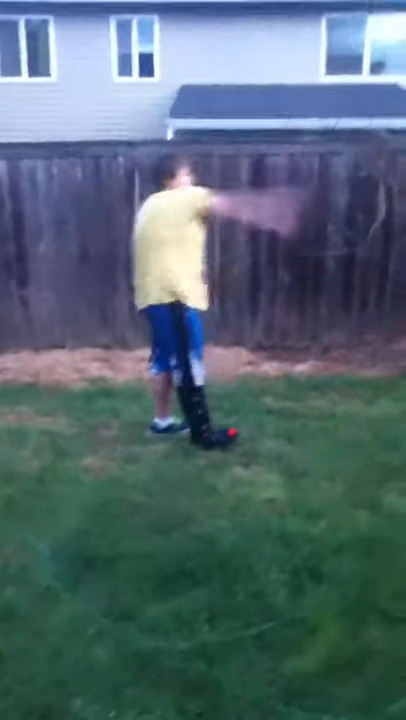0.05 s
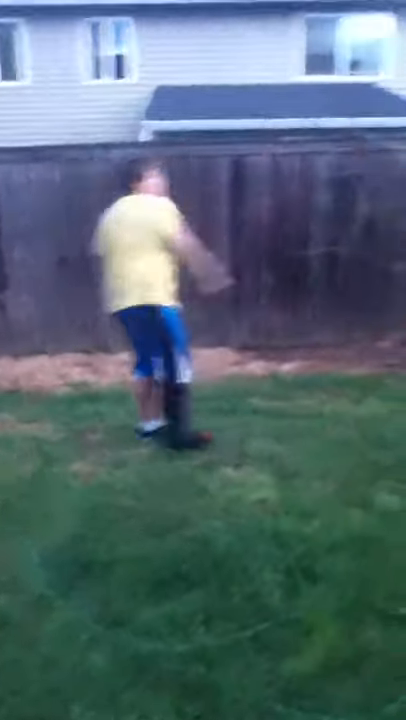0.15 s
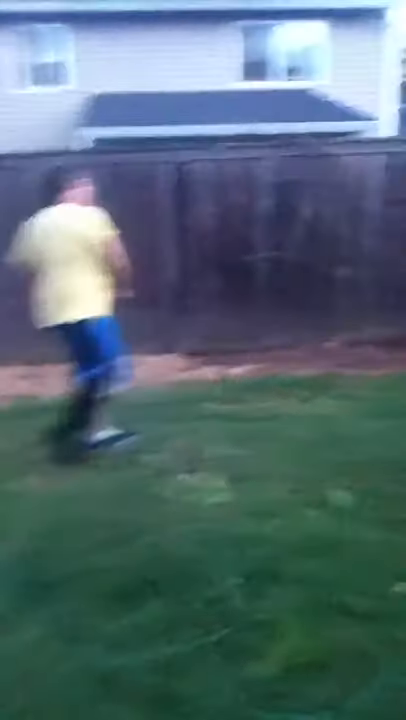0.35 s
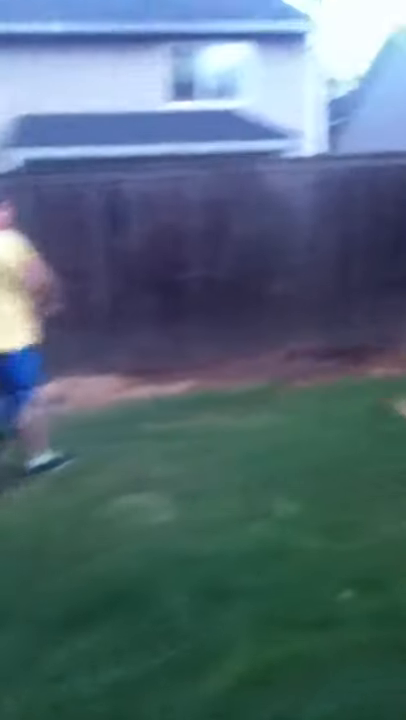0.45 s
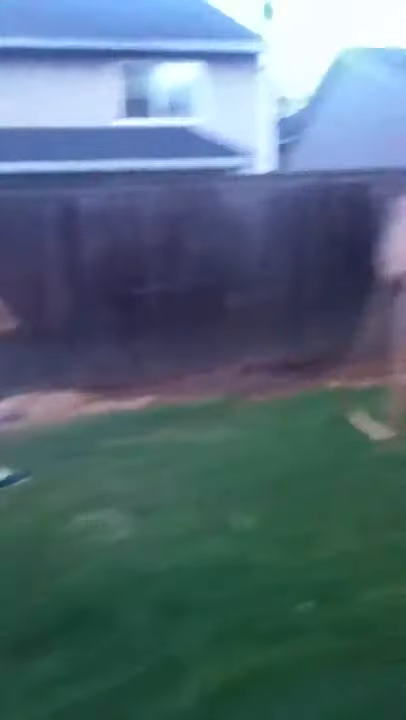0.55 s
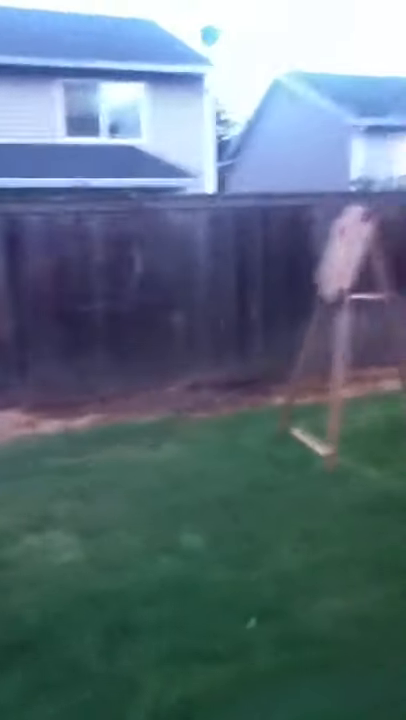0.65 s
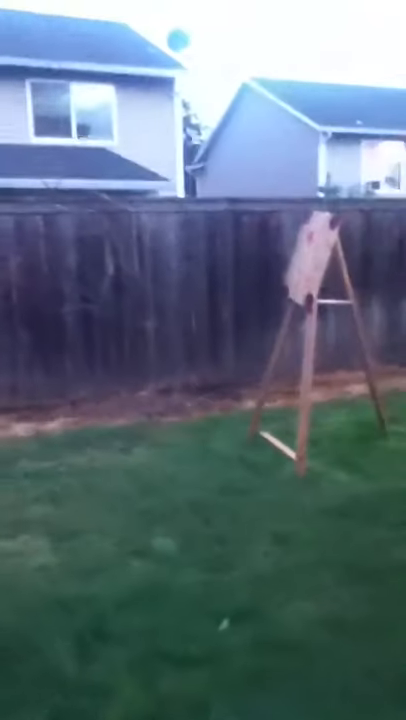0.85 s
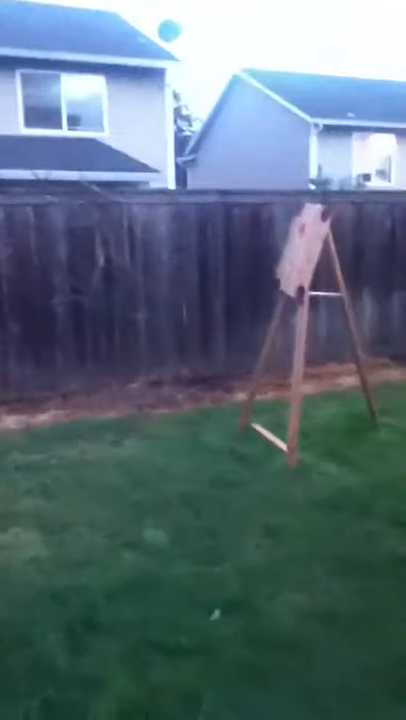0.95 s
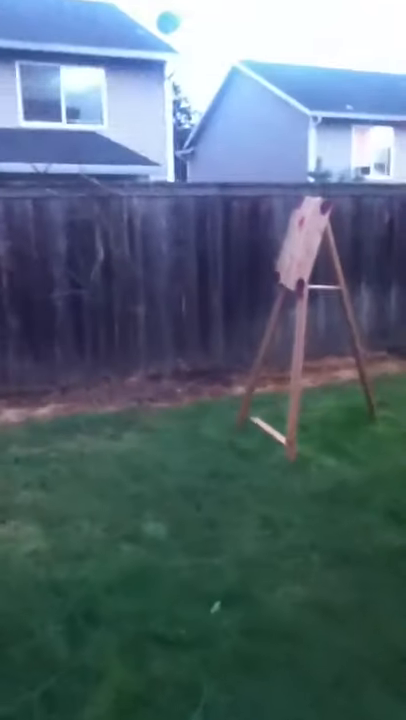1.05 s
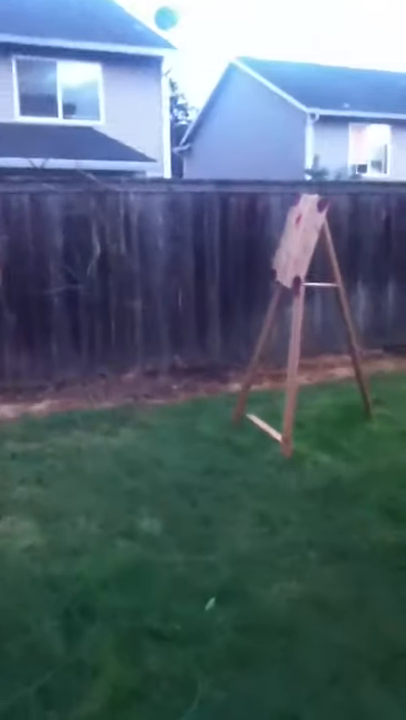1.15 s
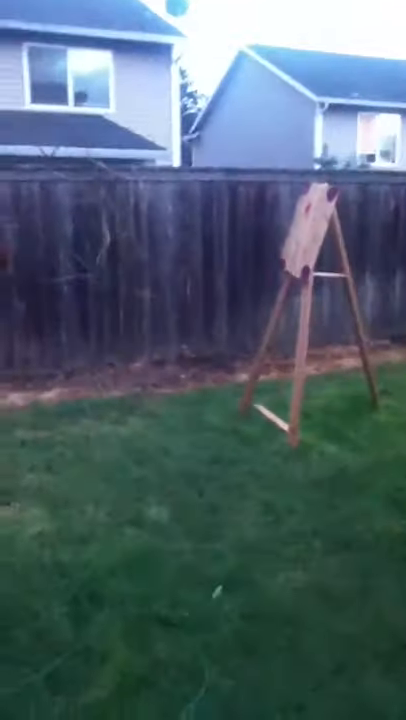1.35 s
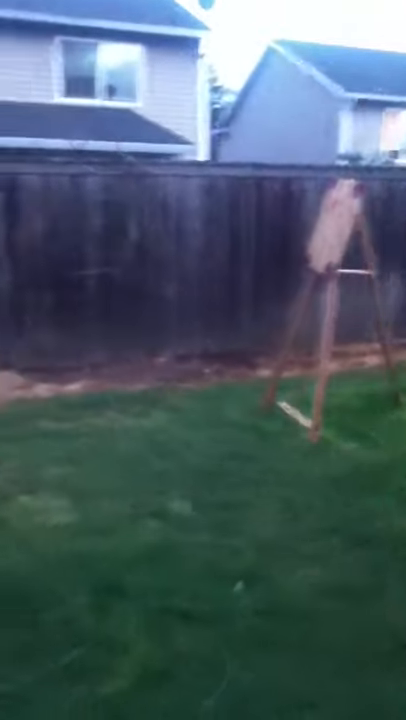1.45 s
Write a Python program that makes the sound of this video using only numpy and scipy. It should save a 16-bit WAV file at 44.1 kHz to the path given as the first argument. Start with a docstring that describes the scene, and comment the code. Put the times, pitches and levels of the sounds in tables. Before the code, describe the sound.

After a faint swish, a knife smacks a wooden board in several rapid contacts and bounces off with a bright throbbing ring, damped by a soft grass landing; outdoor echoes, faint hush, slightly distant small microphone.

```python
"""Thrown knife bouncing off a target

A thrown knife clatters against a wooden target on a stand and bounces off, in a quiet fenced yard.
Noise bursts and decaying modes make the blow; steel modes throb and warble as the knife spins.
It thuds into the grass, which damps the ring. Tick, rustles and a knock are small extra sounds.
Fence and house walls echo the blow as discrete echoes and decaying noise over a faint outdoor hush."""
import sys
import numpy as np
from scipy import signal
from scipy.fft import rfft, irfft
from scipy.io import wavfile
from scipy.ndimage import map_coordinates

SR = 44100
rng = np.random.default_rng(int(sys.argv[2]) if len(sys.argv) > 2 else 0)


def log_audio(samples):
    """Write samples as a 16-bit WAV file to the path given in sys.argv[1]."""
    # one column per channel
    frames = np.atleast_2d(samples).T
    # limit to full scale, then quantise
    limited = np.clip(frames, -1, 1)
    pcm = np.round(limited * 32767).astype(np.int16)
    wavfile.write(sys.argv[1], SR, pcm)


N = 66150

# Radiation of blade flat and edge towards the listener as the knife tumbles.
# Each row: time in seconds, flat level in dB, edge level in dB.
FACING = [(.25, -6.5, 1.5), (.36, 0, -5), (.425, -7.5, -3), (.45, -2, 5), (.485, 3, -1.5), (.525, 1, -5),
          (.55, -2, -2), (.635, 3, 2), (.66, 3, 3.5), (.678, 8.5, -8), (.708, 5, -2), (.725, -3, 10),
          (.755, 6.5, 10), (.78, -2.5, 9.5), (.80, 6.5, -0.5)]
FENCE_LAG_S = 0.029


def undb(db):
    """Decibels to gain."""
    return 10 ** (np.asarray(db) / 20)


def since(start_s):
    """Seconds since start, zero before it."""
    return np.maximum(np.arange(N) / SR - start_s, 0)


def decay(start_s, t60_s, rise_s):
    """Envelope with a quick rise and an exponential fall."""
    age_s = since(start_s)
    return (1 - np.exp(-age_s / rise_s)) * np.exp(-np.log(1000) * age_s / t60_s)


def octaves_from_1khz():
    """Pitch of each FFT bin in octaves about 1 kHz."""
    bin_hz = np.arange(N // 2 + 1) * SR / N
    return np.log2(np.maximum(bin_hz, 1) / 1000)


def noise(points, tilt_db=0):
    """Random-phase noise of unit RMS with the given spectrum, tilted in dB per octave about 1 kHz."""
    hz, db = np.array(points, float).T
    octave = octaves_from_1khz()
    gain = undb(np.interp(octave, np.log2(hz / 1000), db) + tilt_db * octave)
    x = irfft(gain * np.exp(2j * np.pi * rng.random(len(gain))), N)
    return x / x.std()


def burst(x, start_s, t60_s, damp, rise_s):
    """Dense resonances by octave: bass builds up slowest, treble dies first; t60 holds at 1 kHz."""
    octave = np.clip(octaves_from_1khz(), -4, 4)
    spectrum, out = rfft(x), 0
    for k in range(-4, 5):
        band = irfft(spectrum * np.maximum(1 - abs(octave - k), 0), N)
        half_cycle_s = 0.5 / (1000 * 2.0 ** k)
        out = out + band * decay(start_s, t60_s * 2 ** (-damp * k), rise_s + half_cycle_s)
    return out


def ring(modes, start_s, rise_s, scatter=0):
    """Decaying modes struck at start; random phase (up to scatter cycles) for where the blow lands."""
    out = 0
    for hz, db, t60_s in modes:
        cycles = hz * since(start_s) + scatter * rng.random()
        out = out + undb(db) * decay(start_s, t60_s, rise_s) * np.sin(2 * np.pi * cycles)
    return out


def walk(per_s):
    """Smooth chance with a spread near 1, from random knots per_s to the second."""
    knots = rng.standard_normal(2000)
    return map_coordinates(knots, [np.arange(N) / SR * per_s], mode="mirror")


def echo(x, lag_s, db):
    """One reflection: the sound again, later and weaker."""
    return undb(db) * np.interp(np.arange(N) - lag_s * SR, np.arange(N), x, left=0)


def target():
    """Each contact cracks on the wood and rings the board; the late ones add a slap and a short clang."""
    # Contacts of tip, flat and handle. Each row: start in seconds, level in dB, tilt in dB per octave.
    blows = [(.239, -16, 8.5), (0.2421, -12, 2), (.2496, -9.5, 4.5), (.2523, -7, 1.5), (.262, -22, 1),
             (.2875, -21.5, 2), (0.2919, -20, 0), (.299, -23.5, -0.5)]
    # Crack of the wood. Each row: frequency in Hz, relative density in dB per Hz.
    crack = [(50, -42), (110, -10), (220, -8), (320, 1.5), (450, -5), (1100, 3), (2200, -4), (3200, -5.5),
             (5000, -12), (5900, -18.5), (6800, -16), (9000, -27.5), (15000, -45)]
    # Board and stand modes. Each row: frequency in Hz, relative level in dB, t60 in seconds.
    board = [(193.5, -17.5, 0.39), (241, -7.5, 0.16), (316, -4, 0.083), (506.5, -10.5, .3),
             (626, -1.5, 0.12), (721, -1, 0.13), (827, -12, 0.27), (930, -9, .16), (1339, -30, 0.24),
             (1511, -6, 0.22), (1577, -11, 0.35), (1640, -3, .24), (3087, -7, 0.12), (3280, -13, .27)]
    # Modes set off by the late contacts. Each row: frequency in Hz, relative level in dB, t60 in seconds.
    clang_modes = [(1073, -7, 0.17), (1123, -13, 0.48), (1149, -2, 0.076), (1175, -9, 0.51),
                   (1209, -10, 0.47), (1240, -14, 0.26)]
    board_db = -22.5  # at the loudest contact
    slap_hz, slap_t60_s = 1130, 0.08

    out, loudest_db = 0, max(db for _, db, _ in blows)
    for start_s, db, tilt_db in blows:
        out = out + undb(db) * burst(noise(crack, tilt_db), start_s, t60_s=0.058, damp=0.42, rise_s=0.0006)
        board_gain = undb(board_db + db - loudest_db)
        out = out + board_gain * ring(board, start_s, rise_s=0.0002, scatter=0.97)
    slap = undb(-11) * ring([(slap_hz, 0, slap_t60_s)], start_s=0.289, rise_s=0.0015)
    clang = undb(-19.5) * ring(clang_modes, start_s=0.286, rise_s=0.007, scatter=1)
    return out + slap + clang


def spinning(modes, free_s, facing_db, quarter_turns):
    """Blade modes: roll makes them throb, tumbling bends pitch, the fence returns another angle."""
    roll_hz, roll_floor = 13.65, 0.26
    edge_on_s = 0.503  # a moment when the rolling blade points its edge at the listener
    wobble_turns, wobble_per_s = 0.11, 13.96  # unevenness of the roll
    tumble_hz, swing_m, sound_m_per_s = 3.585, 0.032, 343
    fence_db = -8

    t, out = np.arange(N) / SR, 0
    paths = [(0, 0, quarter_turns / 4), (FENCE_LAG_S, fence_db, rng.random())]
    for lag_s, path_db, angle_turns in paths:
        age_s = since(free_s + lag_s)
        for hz, db, t60_s in modes:
            tumble, phase = 2 * np.pi * rng.random(2)
            turns = roll_hz * (t - edge_on_s) + angle_turns + wobble_turns * walk(wobble_per_s)
            doppler_s = swing_m / sound_m_per_s * np.sin(2 * np.pi * tumble_hz * age_s + tumble)
            lobes = np.sin(2 * np.pi * turns) + 1j * roll_floor
            tone = np.real(lobes * np.exp(1j * (2 * np.pi * hz * (age_s + doppler_s) + phase)))
            out = out + undb(db + path_db) * decay(free_s + lag_s, t60_s, rise_s=0.0032) * tone
    return out * undb(np.interp(t, np.array(FACING)[:, 0], facing_db))


def blade():
    """The knife rings in flight, flat and edge about a quarter turn apart, until the grass damps it."""
    # Bending across the flat. Each row: frequency in Hz, relative level in dB, free t60 in seconds.
    flat_modes = [(936, -27.5, 5.8), (1759, 2, 2.13), (2558, -21, 3.6), (2720, -19.5, 3.2),
                  (3958, -12.5, 1.77), (5380, -11, 1.4), (7000, -0.5, 0.71), (8160, -13.5, 1.3),
                  (8861, -5.5, 0.52), (10907, -11.5, 0.49), (11700, -22.5, .65), (13130, -17, 0.3),
                  (13900, -24, 1.1), (14400, -23, .25), (15550, -28, 0.27)]
    # Bending along the edge. Each row: frequency in Hz, relative level in dB, free t60 in seconds.
    edge_modes = [(4722, 1, 1.87), (7762, -3, 1.53), (11950, -4.5, 0.77)]
    free_s, grass_s, grass_t60_s = 0.25, 0.792, 0.36

    _, flat_db, edge_db = np.array(FACING).T
    flat = undb(-31) * spinning(flat_modes, free_s, flat_db, quarter_turns=0)
    edge = undb(-39.5) * spinning(edge_modes, free_s, edge_db, quarter_turns=0.99)
    return (flat + edge) * np.exp(-np.log(1000) * since(grass_s) / grass_t60_s)


def lawn():
    """Dull thuds in the turf, noise plus low resonances, each with a noise brush of grass."""
    # Knife hitting the lawn and settling. Each row: start in seconds, thud level in dB, brush level in dB.
    landings = [(0.791, -44.5, -53), (0.8158, -41, -43), (.889, -49.5, -55.5), (.932, -49, -59.5)]
    # Thud noise. Each row: frequency in Hz, relative density in dB per Hz.
    thud_spectrum = [(30, -32), (70, -19), (105, 9.5), (170, -8), (270, -13.5), (500, -14.5), (1200, -49),
                     (4000, -60)]
    # Grass brush noise. Each row: frequency in Hz, relative density in dB per Hz.
    brush_spectrum = [(200, 1), (1000, -7.5), (1700, 6), (2600, -11.5), (7000, -12), (15000, -29)]
    # Low resonances of the thud. Each row: frequency in Hz, relative level in dB, t60 in seconds.
    turf_modes = [(100, 4, 0.12), (130.5, -7.5, 0.11), (260.5, -3, 0.066)]
    turf_db = 0.5  # relative to the thud noise

    out = 0
    for start_s, thud_db, brush_db in landings:
        thud = noise(thud_spectrum) * decay(start_s, t60_s=0.18, rise_s=0.0014)
        thud = thud + undb(turf_db) * ring(turf_modes, start_s, rise_s=0.00065)
        brush = noise(brush_spectrum) * decay(start_s, t60_s=0.088, rise_s=0.00031)
        out = out + undb(thud_db) * thud + undb(brush_db) * brush
    return out


def small_sounds():
    """A modal tick with its echo off the fence, faint rustles of grainy noise and a soft modal knock."""
    # Small sharp tick. Each row: frequency in Hz, relative level in dB, t60 in seconds.
    tick_modes = [(2240, 5, 0.0049), (2630, 6.5, 0.0033), (4000, -2, 0.0052), (6470, -5, 0.0075),
                  (8800, -6.5, 0.0035)]
    # Soft knock. Each row: frequency in Hz, relative level in dB, t60 in seconds.
    knock_modes = [(600, 2.5, .016), (486, 1.5, .02), (300, -15, 0.045)]
    # Faint dry rustles. Each row: start in seconds, level in dB, rise in seconds, t60 in seconds.
    rustle_rows = [(1.07, -54, 0.041, 0.5), (1.225, -54, .004, 0.098)]
    # Dry grass noise. Each row: frequency in Hz, relative density in dB per Hz.
    dry_grass = [(1000, -17), (2200, -14), (2700, 0), (3300, -1), (4500, -4), (6300, 0.5), (9000, -8.5),
                 (15000, -21)]
    grain_db, grain_per_s = 2, 300

    tick = undb(-22) * ring(tick_modes, start_s=0.6073, rise_s=0.00051)
    grain = noise(dry_grass) * undb(grain_db * walk(grain_per_s))
    rustles = grain * sum(undb(db) * decay(start_s, t60_s, rise_s)
                          for start_s, db, rise_s, t60_s in rustle_rows)
    knock = undb(-42.5) * ring(knock_modes, start_s=1.4795, rise_s=0.0011)
    return tick + echo(tick, FENCE_LAG_S, db=-15) + rustles + knock


def swish():
    """The turning knife fans the air just before it hits: noise swells peaking at one pitch."""
    # Air rushing past. Each row: centre in seconds, level in dB, centre in Hz, 1/e half-length in seconds.
    swishes = [(0.166, -55, 960, 0.022), (0.227, -57.5, 650, 0.046)]
    skirt_db = -20  # two octaves to either side

    t, out = np.arange(N) / SR, 0
    for centre_s, db, hz, length_s in swishes:
        spectrum = [(hz / 4, skirt_db), (hz, 0), (hz * 4, skirt_db), (SR / 2, 2 * skirt_db)]
        swell = np.exp(-((t - centre_s) / length_s) ** 2)
        out = out + undb(db) * swell * noise(spectrum)
    return out


def reflections(blow):
    """Separate reflections of the blow from the fence and the stand."""
    # Each row: lag after the blow in seconds, level in dB.
    echoes = [(.036, -24.5), (.076, -22), (.118, -26.5)]
    return sum(echo(blow, lag_s, db) for lag_s, db in echoes)


def yard():
    """The blow scatters unevenly off the fence boards, then off the houses, as decaying noise."""
    # Reverberation of the yard. Each row: frequency in Hz, relative density in dB per Hz.
    near_spectrum = [(60, -29), (130, -10), (200, -1.5), (400, -20), (700, -10), (1200, 6.5), (2200, -1),
                     (3200, 1), (4500, -10), (7000, -13.5), (10000, -35), (15000, -40)]
    # Reverberation of houses further off. Each row: frequency in Hz, relative density in dB per Hz.
    far_spectrum = [(60, -10), (230, 12.5), (450, 2.5), (1200, -2), (2400, -4.5), (4300, -5.5),
                    (6700, -15.5), (10000, -26), (15000, -45)]
    start_s, near_db, far_db = 0.2604, -21.5, -38
    grain_db, grain_per_s = 3, 320

    near = burst(noise(near_spectrum), start_s, t60_s=0.44, damp=0.13, rise_s=0.0083)
    near = near * undb(near_db + grain_db * walk(grain_per_s))
    far = undb(far_db) * noise(far_spectrum) * decay(start_s, t60_s=1.38, rise_s=0.05)
    return near + far


def hush():
    """Steady outdoor background of shaped noise."""
    # Each row: frequency in Hz, relative density in dB per Hz.
    hush_spectrum = [(20, 2), (45, -9), (90, 5.5), (150, -7.5), (260, -3.5), (450, -10), (900, -13),
                     (2000, -19.5), (4000, -24.5), (7000, -25), (12000, -28.5), (16000, -34)]
    return undb(-54) * noise(hush_spectrum)


def scene():
    """All sources at one microphone."""
    blow = target()
    knife = blow + blade() + lawn() + swish()
    surroundings = reflections(blow) + yard() + hush()
    return (knife + small_sounds() + surroundings)[None]


def record(dry):
    """The small microphone loses the deep bass; the recorder rounds the highest peaks and cuts the top."""
    low_cut_hz, top_hz = 77, 15850
    thin = signal.sosfilt(signal.butter(3, low_cut_hz, "high", fs=SR, output="sos"), dry)
    top_cut = signal.ellip(10, 0.2, 70, top_hz, fs=SR, output="sos")  # ripple and stopband in dB
    return signal.sosfilt(top_cut, np.tanh(thin))


dry = scene()
out = record(dry)
log_audio(out)
```